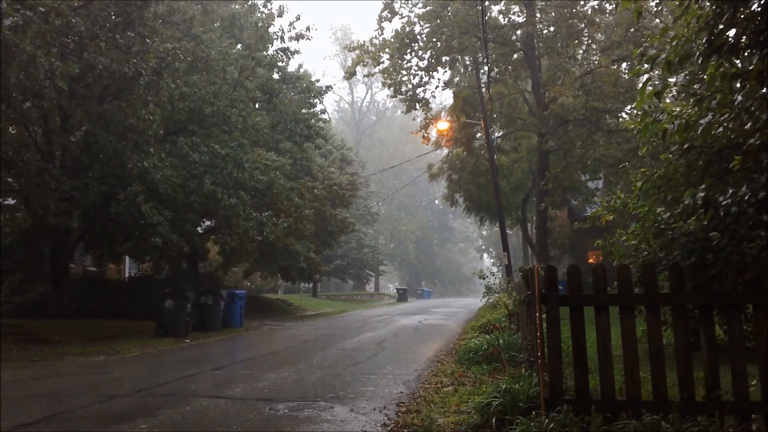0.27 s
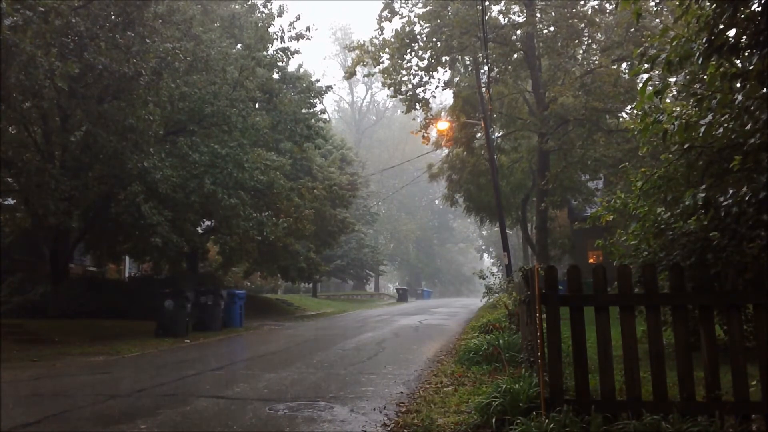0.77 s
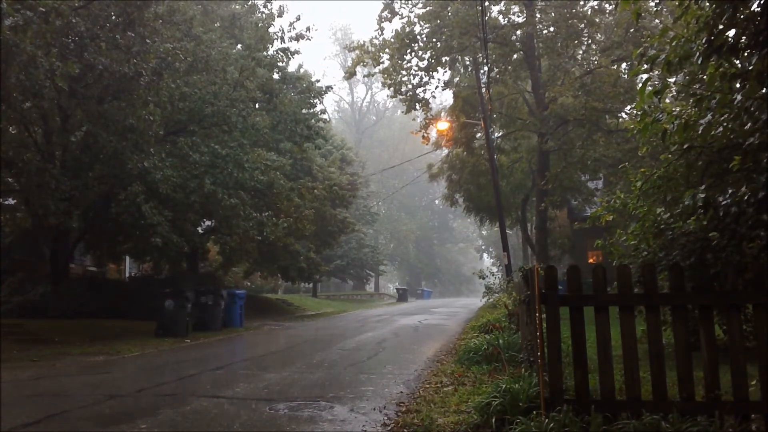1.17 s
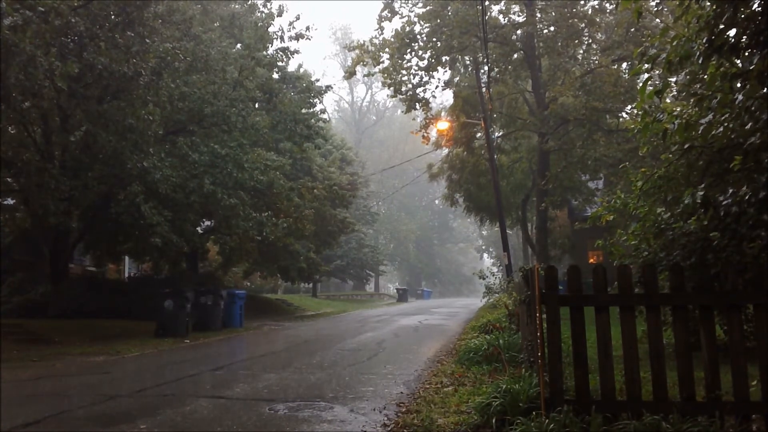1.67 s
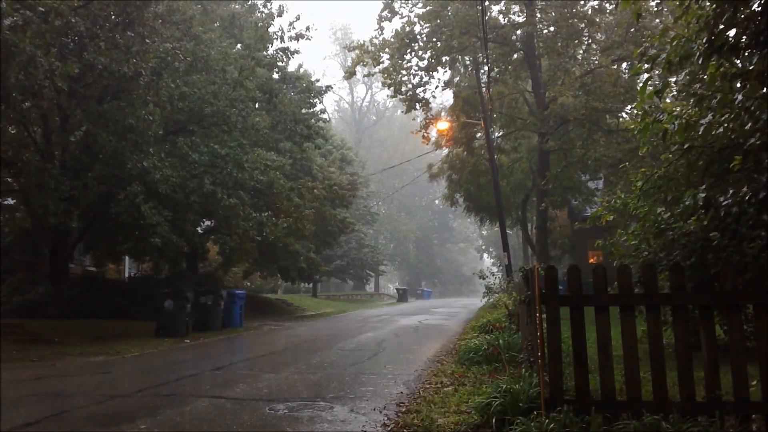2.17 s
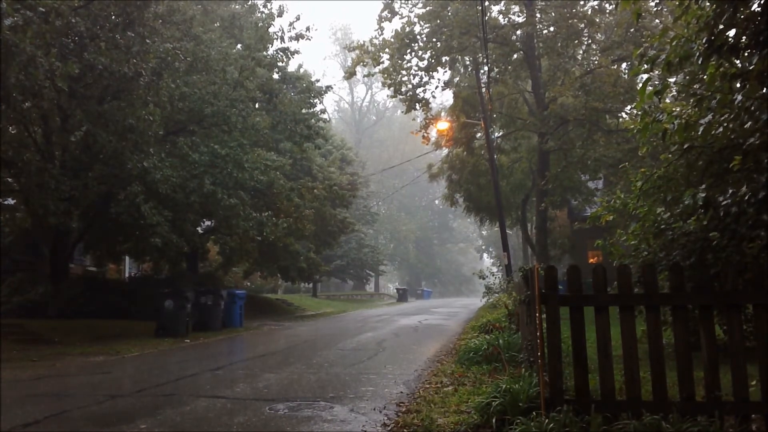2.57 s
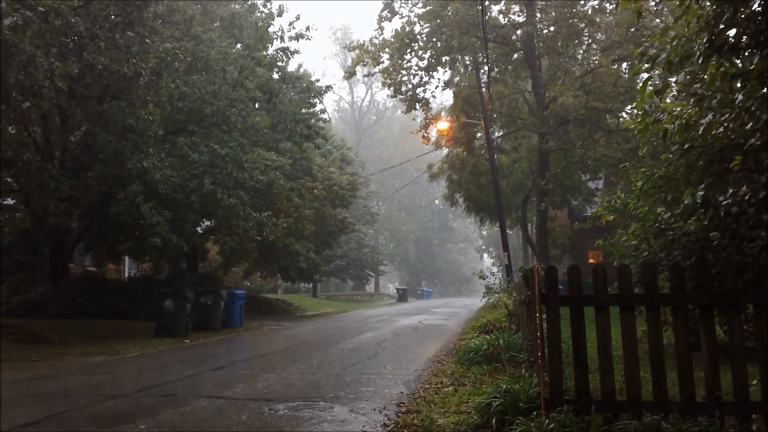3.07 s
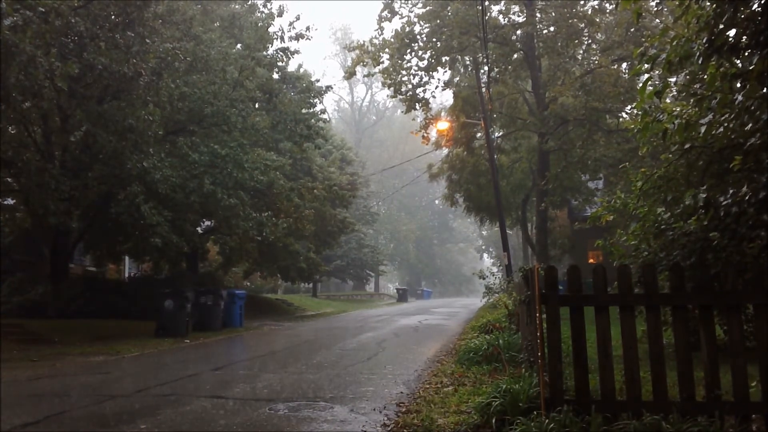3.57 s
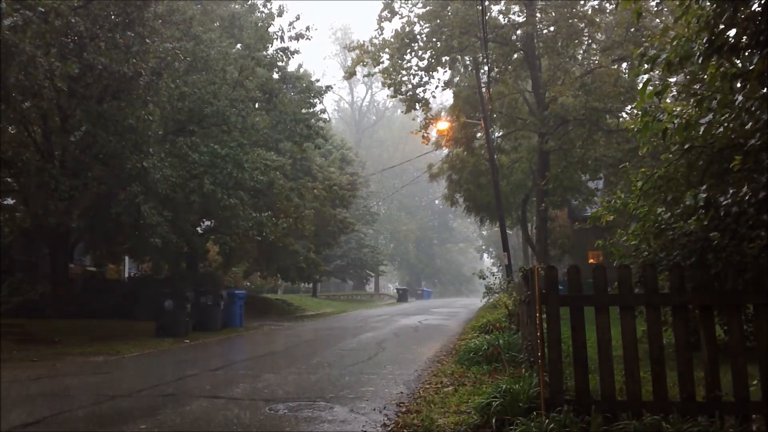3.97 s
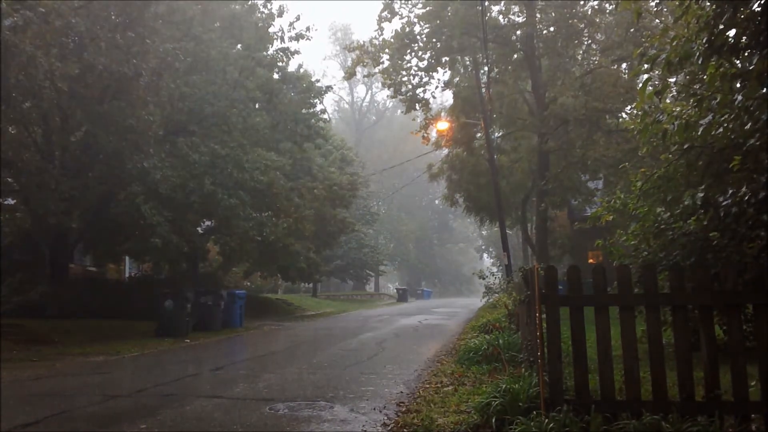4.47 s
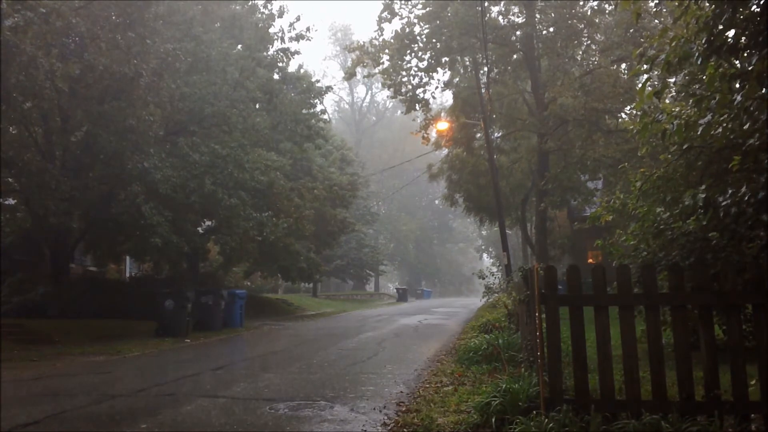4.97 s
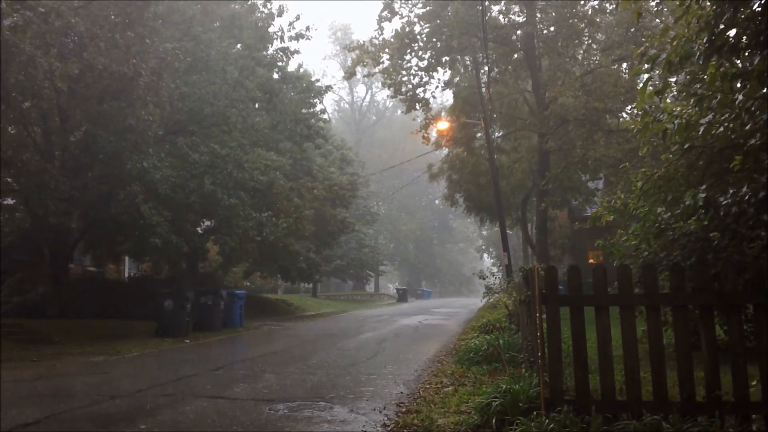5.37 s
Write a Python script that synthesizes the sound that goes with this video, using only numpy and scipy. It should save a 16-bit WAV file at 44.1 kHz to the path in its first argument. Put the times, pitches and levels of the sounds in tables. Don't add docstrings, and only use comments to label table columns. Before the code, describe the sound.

Very close, mono phone sound of rain striking a stretched skin that rings with a hollow mid-low tone. Violent overloaded hits come early, then small even drips tick off an edge. A dense burst of drops lands midway, followed by separate sharp splats to the end. Behind, muffled wet-road noise and a distant car's low hum swell gently, dipping after loud hits.

```python
import sys
import numpy as np
from scipy import signal
from scipy.fft import rfft, irfft, next_fast_len
from scipy.io import wavfile
from scipy.ndimage import uniform_filter1d

SR = 44100
rng = np.random.default_rng(int(sys.argv[2]) if len(sys.argv) > 2 else 0)


def amplitude_ratio(level_db):
    exponent = np.asarray(level_db, float) / 20
    return 10 ** exponent


def digitize_waveform(pressure):
    field = np.atleast_2d(pressure).T
    bounded = np.clip(field, -1, 1)
    quanta = np.round(bounded * 32767).astype(np.int16)
    wavfile.write(sys.argv[1], SR, quanta)


N = 248718
TIME = np.arange(N) / SR


def level(x, db):
    return x * amplitude_ratio(db) / np.sqrt(np.mean(x ** 2))


def band(x, hz, width):
    return signal.lfilter(*signal.iirpeak(hz, hz / width, SR), x)


def ring(hz, t60, rise=.0005):
    t = np.arange(3000) / SR
    decay = amplitude_ratio(-60 * t / t60)
    return -np.sin(2 * np.pi * hz * t) * decay * (1 - np.exp(-t / rise)) ** 2


def add(out, s, x):
    i = int(s * SR)
    out[i:i + len(x)] += x[:N - i]


def walk(rate):
    hold = int(SR / rate)
    steps = np.repeat(rng.standard_normal(N // hold + 1), hold)
    return 1.4 * uniform_filter1d(uniform_filter1d(steps, hold), hold)[:N]


def drops(rate, spread_db):
    luck, size, sign = rng.random(N), rng.exponential(size=N), rng.choice([-1., 1.], N)
    return (luck < rate / SR) * sign * amplitude_ratio(np.minimum(spread_db * size, 4 * spread_db))


# (time [s], level [dB])
CAR_LEVEL = [
    (0, 0),
    (1.0, -2),
    (2.0, 2.5),
    (3.0, -0.5),
    (4.0, 1.5),
    (4.8, 1),
    (5.64, 1),
]


def car_level_db():
    return np.interp(TIME, *np.transpose(CAR_LEVEL))


# (frequency [Hz], density [dB per Hz])
STREET_COLOUR = [(30, -11.5), (100, -4.5), (500, 4.5), (1000, -6.5), (1500, -15.5), (2500, -25),
                 (4000, -33.5), (6500, -42), (9500, -42), (11700, -49), (12600, -72.5), (13400, -51),
                 (15300, -42), (15700, -89.5)]


def hiss():
    size = next_fast_len(N)
    white = rfft(rng.standard_normal(N), size)
    octave = np.log2(np.fft.rfftfreq(size, 1 / SR) + 1)
    colour_hz, colour_db = np.transpose(STREET_COLOUR)
    colour = white * amplitude_ratio(np.interp(octave, np.log2(colour_hz), colour_db))
    out = 0
    for mid in np.arange(4.5, 15, .5):
        one_band = irfft(colour * np.clip(1 - 2 * abs(octave - mid), 0, 1), size)[:N]
        out = out + amplitude_ratio(2.1 * walk(13)) * one_band
    return level(out, 12)


# (order [multiple of the base rate], level [dB])
ENGINE_ORDERS = [
    (2, 9),
    (3, 3.5),
    (4, 7),
    (5, -9),
    (6, -1),
]


def engine():
    base_hz = 31.754
    turn = 2 * np.pi * np.cumsum(base_hz * (1 + 0.011 * walk(4))) / SR
    hum = sum(amplitude_ratio(db + 2.5 * walk(9)) * np.sin(k * turn + k) for k, db in ENGINE_ORDERS)
    return level(hum, 13)


# (frequency [Hz], t60 [s], level [dB])
COVER_MODES = [
    (183.5, .08, -9),
    (371, 0.31, 10.5),
    (528, 0.74, 12),
    (629.6, 0.28, -6),
    (680, .08, -18),
]


def cover(x):
    out = 0
    for hz, t60, db in COVER_MODES:
        width_hz = np.log(1000) / np.pi / t60
        out = out + amplitude_ratio(db) * band(x, hz, width_hz) / np.sqrt(1 / t60)
    return out


# (frequency [Hz], width [Hz], level [dB])
SKIN_MODES = [
    (130, 30, -16.5),
    (256, 390, -15.5),
    (540, 120, -5),
    (625.2, 134.3, 11.5),
    (681, 30, -16.5),
    (900, 440, -42),
]


def patter():
    hits = drops(500, 2.9)
    skin = 0
    for hz, width, db in SKIN_MODES:
        skin = skin + amplitude_ratio(db) * band(band(hits, hz, 1.28 * width), hz, 1.28 * width)
    ticks = drops(110, 3.0)
    ticks = band(band(ticks, 3800, 2400), 3800, 2400)
    out = level(skin, 22) + level(cover(hits), 9.5) + level(ticks, -21.5)
    return signal.sosfilt(signal.butter(6, 9000, fs=SR, output="sos"), out)


# (time [s], depth [dB], release [dB/s]); brief cracks let go quickly
DUCKS = [(-.2, 13, 11), (.213, 21, 49), (.325, 24.5, 19), (.37, 30, 9.5), (.555, 30, 13.5), (.69, 29, 20),
         (1.64, 7.5, 9), (2.455, 28, 12), (2.595, 29, 13.5), (2.695, 28, 18.5), (3.487, 14, 18),
         (4.817, 19, 51), (4.9, 9, 4), (5.095, 7.5, 6.5)]


def gain_control():
    rest_db = -42
    load = np.zeros(N)
    for s, depth_db, release_db in DUCKS:
        duck = amplitude_ratio(depth_db - release_db * np.maximum(TIME - s, 0))
        load = np.maximum(load, (TIME >= s) * duck)
    return amplitude_ratio(rest_db) / (1 + uniform_filter1d(load, size=130))


def faint_top(bed, gain):
    lost_db, back_db = -67, -62.5
    top = signal.sosfiltfilt(signal.butter(6, 12300, "high", fs=SR, output="sos"), bed)
    return bed - top * np.interp(gain, amplitude_ratio(np.array([lost_db, back_db])), [1, 0])


# (time [s], drips [count])
DRIP_RUNS = [(.592, 2), (.813, 2), (.977, 1), (1.079, 1), (1.282, 2), (1.382, 2), (1.492, 1), (1.593, 1),
             (1.795, 1), (1.866, 3), (1.961, 1), (2.112, 1), (2.169, 3), (2.468, 4), (2.826, 1), (2.848, 1),
             (2.901, 3), (3.152, 1), (3.218, 2), (3.363, 4), (3.707, 5), (4.348, 1), (4.371, 1), (4.486, 3),
             (4.669, 1), (4.69, 1), (5.141, 2), (5.237, 2), (5.442, 2), (5.543, 1)]


def drips(gain):
    gap_s, lead_s = 0.04, 0.0016
    s = np.concatenate([start - lead_s + gap_s * np.arange(n) for start, n in DRIP_RUNS])
    scatter_db = rng.standard_normal(len(s))
    db = 20 * np.log10(np.interp(s, TIME, gain)) + 15.5 + scatter_db
    return list(zip(s, db))


# (time [s], tick peak [dB])
TICKS = [
    (.3585, -52.5),
    (0.4490, -44),
    (.5285, -46),
    (1.1795, -41),
    (2.1915, -32.5),
    (2.4105, -36.5),
    (2.4205, -34),
    (2.428, -34),
    (2.7852, -40),
    (5.4085, -37),
]
# (time [s], tick peak [dB], snap [dB], snap frequency [Hz], air [dB re tick])
SPLATS = [(0.2109, -12, -1.5, 1345, -7), (0.3192, -0.5, -4.5, 1500, -12), (0.3657, -26, -19.5, 1306, -25),
          (1.0195, -37.5, -40, 1530, -36), (1.5279, -36.5, -36.5, 2150, -26),
          (1.6331, -18, -17.5, 2095, -39.5), (2.4488, -8, -13, 1368, -8.5),
          (2.579, -18.5, -26.5, 1530, -51.5), (2.6896, -34, -36.5, 1440, -10.5),
          (2.7494, -35.5, -40.5, 1650, -18.5), (2.8702, -39, -37, 1540, -27), (3.3094, -25, -39, 1740, -38),
          (3.3672, -30, -31, 1500, -7), (3.4825, -16.5, -6, 1570, -24.5), (3.538, -41, -21.5, 1434, 5.5),
          (3.7665, -22, -11.5, 1562, -30.5), (4.0254, -28, -29, 2030, -37), (4.2083, -31, -30.5, 1870, -6),
          (4.2247, -28, -27, 1410, -14), (4.7531, -41, -29, 1420, -34), (4.814, -5, -2.5, 1515, -7),
          (4.9912, -24, -19.5, 1620, -33.5), (5.0922, -12.5, -10, 1578, -18),
          (5.215, -34.5, -39.5, 1580, -13.5)]


def splats(drip_rows):
    out, t = np.zeros(N), np.arange(400) / SR
    small = [(s, db, db - 7, 1500, -44) for s, db in TICKS + drip_rows]
    rows = SPLATS + small
    sprays = rng.standard_normal((len(rows), 400))
    for (s, db, snap_db, snap_hz, air_db), spray in zip(rows, sprays):
        burst = (t == 0) + amplitude_ratio(-19.5) * spray * np.exp(-t / 0.00091)
        tick = band(band(band(burst, 3550, 2600), 3550, 2600), 3600, 5100)
        air = band(band(burst, 6000, 6000), 6000, 6000)
        snap = band(ring(snap_hz, 0.002015, .0001)[:400], snap_hz, 1.5 * snap_hz)
        film = tick / abs(tick).max() + amplitude_ratio(air_db + 19.5) * air
        add(out, s + 0.0013, amplitude_ratio(db - 2.5) * film + amplitude_ratio(snap_db + 15.5) * snap)
    return out


# (time [s], peak [dB], start frequency [Hz], end frequency [Hz], t60 [s])
BUMPS = [(0.3208, -13, 192, 171.7, 0.058), (0.365, -4, 560, 116.8, 0.031), (0.5296, -23, 640, 590, 0.02),
         (0.552, -38, 153.7, 140, 0.013), (0.6863, -13.5, 148, 130, 0.0169),
         (1.1811, -44.5, 2200, 2300, 0.0266), (1.362, -33.5, 270, 150, 0.023),
         (1.64, -29.5, 101.9, 100.2, 0.53), (2.411, -22.5, 125, 120, .06), (2.425, -15, 125.6, 122.2, .06),
         (2.4213, -30, 2050, 2010, 0.0088), (2.4308, -14, 982, 330, 0.023), (2.435, -9.5, 90.8, 70, 0.053),
         (2.4524, -9, 337, 334, 0.0131), (2.4438, -1.5, 152.1, 198.6, 0.024),
         (2.4468, -4.5, 385.7, 404, 0.019), (2.5911, -5.5, 512, 620, 0.0139),
         (2.5927, -19, 201, 120, 0.015), (2.6885, -3, 511.3, 420, 0.01073), (3.9405, -14, 383, 250, 0.0078),
         (4.2115, -25.5, 1830, 1880, 0.011), (4.335, -22, 285, 150, 0.046),
         (4.7549, -28.5, 3730, 3800, 0.015)]


def bumps():
    out, t = np.zeros(N), np.arange(8000) / SR
    for s, db, from_hz, to_hz, t60 in BUMPS:
        hz = to_hz + (from_hz - to_hz) * np.exp(-t / .003)
        push = (1 - np.exp(-t * from_hz / 0.26)) ** 2
        x = np.sin(2 * np.pi * np.cumsum(hz) / SR) * amplitude_ratio(-60 * t / t60) * push
        add(out, s, -amplitude_ratio(db) * x / abs(x).max())
    return out


# (time [s], peak [dB], ring
# frequency [Hz])
LIGHT_DROPS = [(0.045, -31, 543), (0.288, -26.5, 506), (0.912, -35, 692), (1.02, -29, 677),
               (1.183, -25.5, 550), (2.825, -25.5, 536.3), (3.05, -29.5, 629), (3.581, -21.5, 524.5),
               (3.825, -22.5, 528), (4.084, -28, 560), (4.141, -24.5, 592), (4.213, -18.5, 711),
               (4.419, -23.5, 624), (4.469, -25, 371), (4.813, -26.5, 692), (.105, -22.5, 535),
               (1.66, -20, 532), (1.686, -20.5, 553), (1.783, -21, 680), (5.6, -20.5, 359),
               (4.332, -14.5, 330), (4.754, -14.5, 362.8), (4.768, -14, 487), (5.562, -13.5, 378.7),
               (5.046, -24, 516), (5.536, -15, 571)]
# (time [s], peak [dB], ring frequency [Hz], ring t60 [s])
FAT_DROPS = [(0.101, -16.5, 371, 0.11), (0.21, -11, 604.4, 0.029), (1.634, -5.5, 660.5, 0.0448),
             (1.859, -21.5, 503.2, 0.101), (1.977, -17, 706.3, 0.0325), (2.061, -16.5, 520.5, 0.0556),
             (2.194, -5.5, 614, 0.0259), (2.229, -20, 673.3, 0.053), (2.269, -20, 658, 0.048),
             (2.385, -15.5, 508, 0.0183), (2.409, -16, 346, 0.052), (2.422, -18.5, 542.4, 0.087),
             (2.5793, -18.5, 650, 0.018), (3.367, -20, 642.7, 0.0238), (3.482, -6.5, 672, 0.0143),
             (3.531, -16, 502.5, 0.0643), (3.766, -11, 639, 0.0262), (4.0265, -16, 531.6, 0.0315),
             (4.109, -18, 505, 0.0225), (4.331, -9, 514.5, 0.0853), (4.352, -12, 535.4, 0.0916),
             (4.644, -15, 545.5, 0.0326), (4.752, -7, 528, 0.05), (4.991, -15.5, 628, 0.0193),
             (5.092, -6.5, 643, 0.0123), (5.14, -17, 621, 0.022), (5.405, -17, 367.5, 0.1124),
             (5.560, -13, 506.8, 0.124), (2.4305, -10.5, 517.6, 0.03), (5.589, -11.5, 502, 0.0132)]


def thuds():
    near, push = np.zeros(N), np.zeros(N)
    fat = [row + (-27 + 209.5 * row[-1], -26.5) for row in FAT_DROPS]
    light = [row + (0.029, -7, -18) for row in LIGHT_DROPS]
    for s, db, hz, t60, hum_db, boom_db in fat + light:
        spot = ring(hz, max(t60, .004))
        boom = ring(120, 0.073, 0.0041)
        add(near, s + 0.0013, amplitude_ratio(db) * (spot / abs(spot).max() + amplitude_ratio(boom_db) * boom))
        add(push, s + .0015, amplitude_ratio(db + hum_db) * np.hanning(24))
    return near + amplitude_ratio(26.5) * cover(push)


# (time [s], ceiling [dB], overdrive [dB], sag [share of swing], upper mode [dB])
SLAMS = [
    (0.3206, -5, 23.5, 0.09, 0.5),
    (0.5479, -5, 29, 0.085, -15.5),
    (0.6837, -7, 12.5, 0.024, 3.5),
]


def slams():
    out, t = np.zeros(N), np.arange(3000) / SR
    sag = np.exp(-((t - .0083) / .0021) ** 2)
    for s, top_db, drive_db, share, upper_db in SLAMS:
        swing = ring(683.65, .022, .0001)
        swing = swing + amplitude_ratio(upper_db) * ring(1190, 0.013, .0001)
        swing = swing + amplitude_ratio(-17) * ring(430, 0.021) - share * sag
        add(out, s, amplitude_ratio(top_db) * np.clip(amplitude_ratio(drive_db) * swing, -1, 1))
    out = signal.lfilter(*signal.butter(1, 9000, fs=SR), out)
    return signal.lfilter(*signal.butter(1, 90, "high", fs=SR), out)


def scene():
    car_db = car_level_db()
    road = amplitude_ratio(6 + car_db) * hiss()
    rain = amplitude_ratio(-0.23) * patter()
    motor = amplitude_ratio(0.43 + .8 * car_db) * engine()
    gain = gain_control()
    bed = gain * faint_top(road + rain + motor, gain)
    close = thuds() + bumps() + splats(drips(gain)) + slams()
    return (bed + close)[None]


def top_cut(x):
    return signal.sosfilt(signal.butter(12, 16530, fs=SR, output="sos"), x)


def record(dry):
    x = signal.sosfilt(signal.butter(1, 30, "high", fs=SR, output="sos"), dry)
    x = np.clip(x, -1, 1)
    x = signal.sosfilt(signal.ellip(8, .1, 50, 16500, fs=SR, output="sos"), x)
    return top_cut(x)


dry = scene()
out = record(dry)
digitize_waveform(out)
```